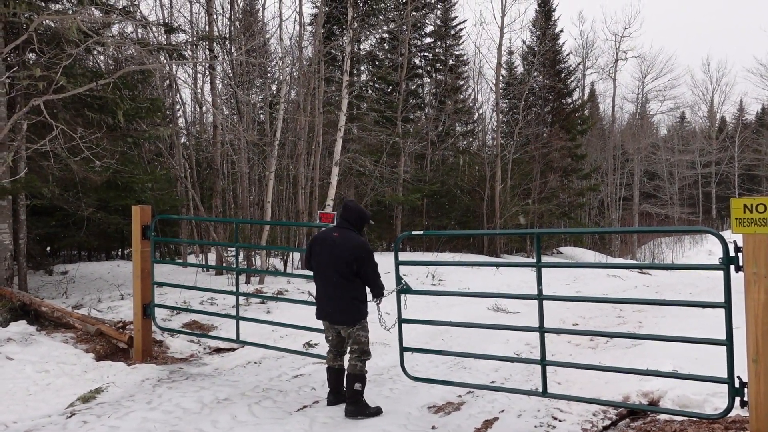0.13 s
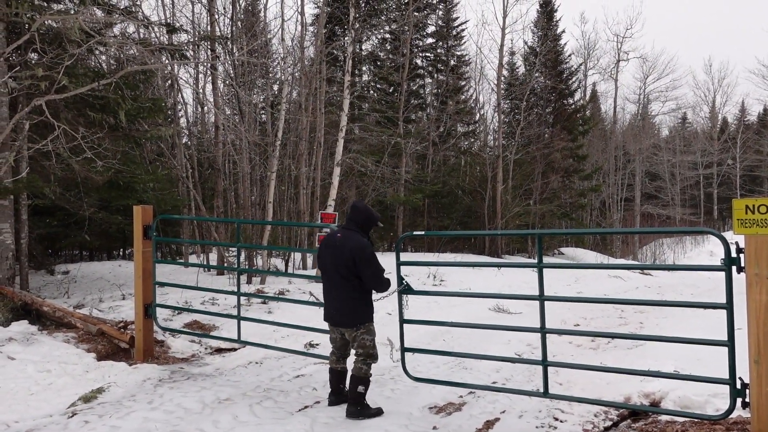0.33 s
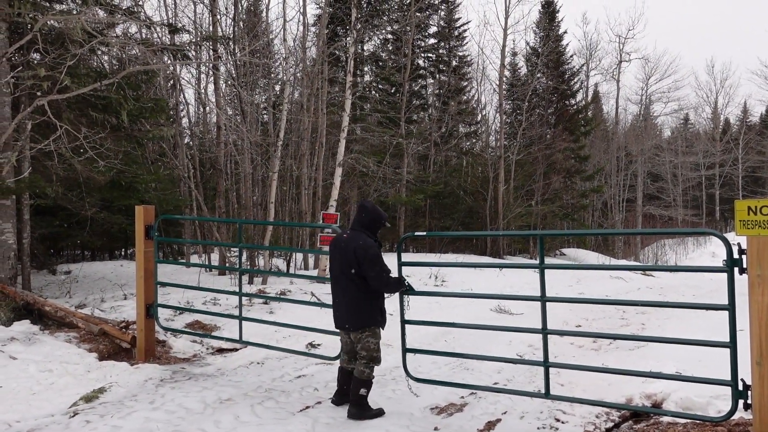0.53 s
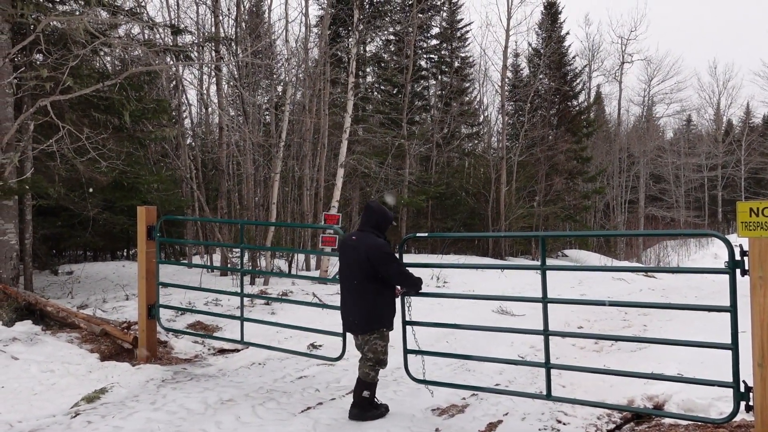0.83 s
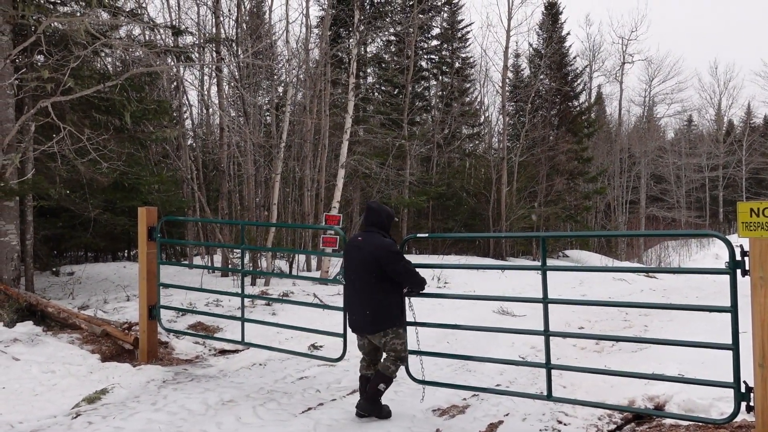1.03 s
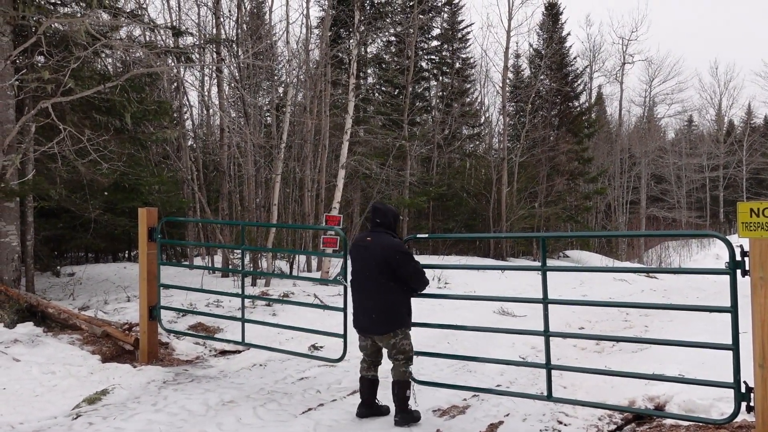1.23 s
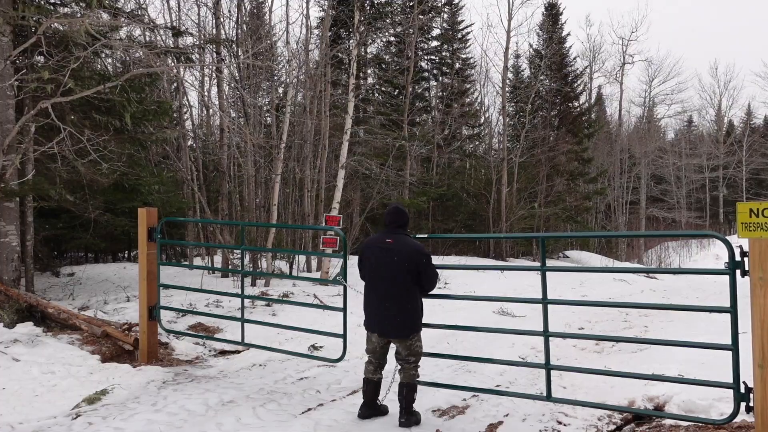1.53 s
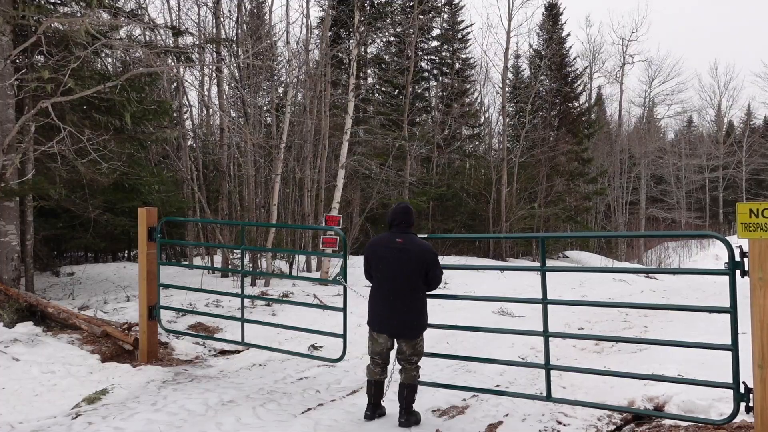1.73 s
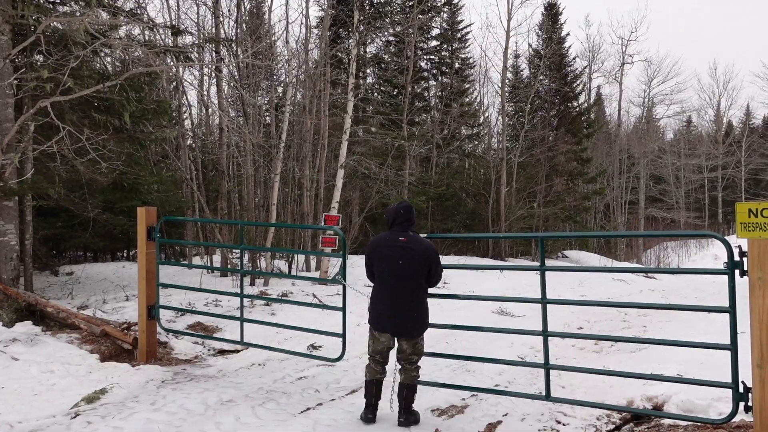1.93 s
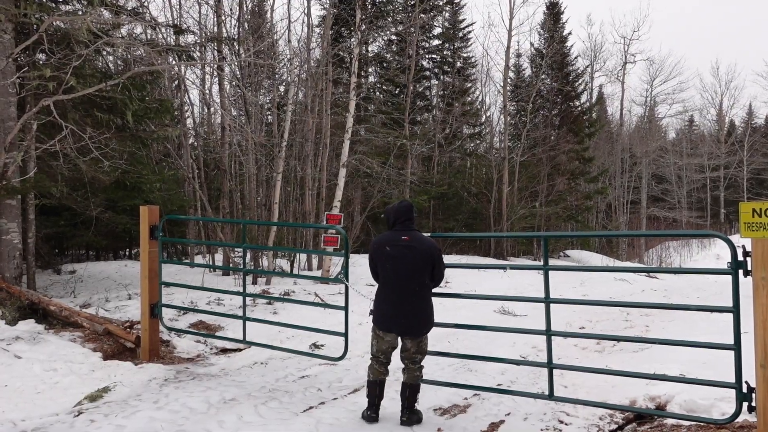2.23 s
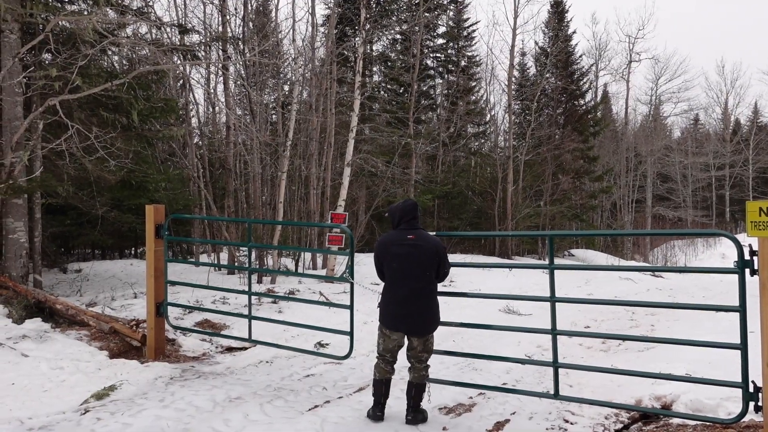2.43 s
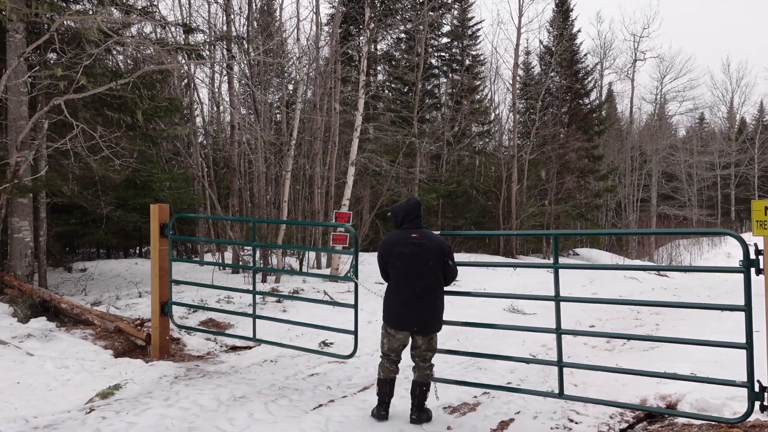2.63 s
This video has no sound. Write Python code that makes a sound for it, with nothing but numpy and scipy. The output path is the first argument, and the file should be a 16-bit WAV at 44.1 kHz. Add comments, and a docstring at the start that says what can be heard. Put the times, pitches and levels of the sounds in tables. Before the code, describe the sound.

Chain clattering on hollow metal gate tubes outdoors, bright ringing clanks with tiny link tinkles

```python
"""On a snowy forest track, a steel chain is unwound from two hollow tube farm gates, some metres away.
Runs of links clatter on the tubes: clusters of impulses excite many decaying modes and noise crashes.
The end hook, the second gate and a long bar ring as sums of decaying sines; loose links tinkle very high.
Boots thud softly in the snow as short noise bursts. The trees return a faint noise-tail echo,
and quiet outdoor air is coloured noise with a faint low drone."""
import sys
import numpy as np
from scipy import signal
from scipy.fft import rfft, irfft
from scipy.io import wavfile

SR = 44100
rng = np.random.default_rng(int(sys.argv[2]) if len(sys.argv) > 2 else 0)


def wav_out(sig):
    """Save sig, one row per channel (or a flat mono array), as 16-bit PCM at SR to the path in sys.argv[1]."""
    wavfile.write(sys.argv[1], SR, np.round(np.clip(np.atleast_2d(sig).T, -1, 1) * 32767).astype(np.int16))


N = 123480
T = np.arange(N) / SR
TOP_HZ = 15950

# Outdoor air spectrum. Each row: frequency in Hz, relative density in dB.
AIR_COLOUR = [(50, -32.5), (110, -6), (200, 2.5), (400, -4), (650, 1.5), (1200, 3), (2500, -1), (5000, -6),
              (9000, -24), (15500, -20)]
AIR_DB, AIR_SWELL_DB = -50.5, 0.5
AIR_SIDE = 0.21  # stereo difference, as a share of the centre
# Faint low drone. Each row: time in seconds, level in dB.
DRONE_LEVEL = [(0, -102), (.5, -72), (.7, -54.5), (1.3, -64), (1.7, -79), (2.8, -82)]
DRONE_HZ = 219

ECHO_DB, ECHO_T60_S, ECHO_RISE_S = -35, 0.7, 0.055

# Boots in the snow. Each row: start in seconds, relative level in dB.
STEPS = [(.806, -50), (1.282, -36.5), (1.631, -51), (1.682, -49)]
# Spectrum of a boot thud. Each row: frequency in Hz, level in dB.
STEP_COLOUR = [(40, -25), (90, -8), (160, 3.5), (250, 2), (380, -13.5), (1200, -52), (5000, -59)]
# Small crunches of the snow crust. Each row: start in seconds, relative level in dB.
CRUNCHES = [(1.874, -40.5)]
# Spectrum of a crunch. Each row: frequency in Hz, level in dB.
CRUNCH_COLOUR = [(300, -30), (1150, 5), (1800, -8), (8000, -29), (14000, -34)]
STEP_T60_S, CRUNCH_T60_S = 0.065, 0.048
SNOW_RISE_S = 0.0024  # attack of thuds and crunches alike

# Knock on a long bar, already ringing out. Each row: start in seconds, level in dB.
LONG_BAR_HITS = [(-.05, -37)]
# Modes of the long bar. Each row: frequency in Hz, level in dB, t60 in seconds.
LONG_BAR_MODES = [(620, -13, 1.2), (835, -12, 1.1), (1179, -2, 1.3), (1592, -4.5, 1.8), (1820, -2, 1.9),
                  (2422, -9, 1.2), (2536, -4, .8), (3946, -1, .55), (5200, -3, .55)]
# Knocks that reach the second gate. Each row: start in seconds, level in dB.
FAR_GATE_HITS = [(2.471, -29)]
# Modes of the second gate. Each row: frequency in Hz, level in dB, t60 in seconds.
FAR_GATE_MODES = [(1240, -11, 1.0), (1825, -11, .85), (2117, -2, .55), (2198, -5, .45), (3737, -7.5, 1.1),
                  (3903, -11, .85), (4002, -7, .4), (5430, -4, .48)]
# Clangs of the end hook. Each row: start in seconds, level in dB.
HOOK_HITS = [(.385, -23), (.414, -20), (.519, -19.5), (1.192, -26)]
# Modes of the end hook. Each row: frequency in Hz, level in dB, t60 in seconds.
HOOK_MODES = [(4015, -7, .3), (5762, -2, .4), (6112, -5, .35), (6141, -1, .35), (6704, -5, .35),
              (6734, -3, .35)]
KNOCK_SCATTER_DB = 1.2  # random spread of mode levels from knock to knock

# Link against link. Each row: start in seconds, ring level in dB, relative tick level in dB.
TINKLES = [(.138, -45.5, 1), (.189, -21.5, -11), (.208, -24.5, -12.5), (.225, -22, -18),
           (0.262, -20.5, -18), (.269, -27.5, -3.5), (.292, -22, -12.5), (.329, -18.5, -31),
           (.48, -16, -15), (.498, -13.5, -24), (.514, -23, 1), (.571, -20.5, 4), (.598, -22, 5),
           (0.849, -42.5, 5.5), (0.885, -40.5, -5), (1.008, -35.5, -9), (1.089, -24, -14),
           (1.107, -24, -11), (1.638, -41.5, 5), (1.649, -32.5, -14), (1.747, -42, -23), (1.85, -38, -16),
           (1.862, -29, -16), (1.885, -30, -28), (1.916, -31.5, -19)]
# Modes of the links. Each row: frequency in Hz, level in dB, t60 in seconds.
LINK_MODES = [(11285, -17, .17), (11735, -9, .2), (12075, -1, .22), (12196, -7, .18), (12360, -12, .13),
              (12505, -3, .2), (13057, -14, .17)]
# Spectrum of the tick. Each row: frequency in Hz, level in dB.
TICK_COLOUR = [(800, -28), (3000, -2), (7000, -1), (10000, -4), (12200, 1), (14500, -16)]
LINK_DETUNE, LINK_SCATTER_DB = 0.00099, 5  # random spread of pitch (as a ratio) and of level
PING_RISE_S, TICK_T60_S = 0.005, 0.0062

# Chain blows on the gate. Each row: start in seconds, level in dB, brightness in dB per octave,
# time constant of the clatter in seconds, relative ring of the main modes in dB.
BLOWS = [(-.06, -27, 4.5, 0.014, -9), (0.377, -18, 4, 0.0089, -3), (.385, -20.5, -3, 0.041, -6),
         (0.413, -16, 13, 0.079, -16), (.44, -19, -4, 0.018, 4), (.49, -31.5, 1, 0.062, 16.5),
         (0.518, -18, -4, 0.015, -0.5), (0.54, -16.5, 11, 0.061, -0.5), (0.584, -18.5, 2, 0.035, 4),
         (.607, -19.5, -6, 0.023, -0.5), (0.625, -24.5, -1, 0.021, 4), (.709, -22.5, 0.5, 0.0096, -9),
         (.872, -33, -8.5, 0.0038, -5.5), (1.01, -42.5, -6.5, 0.012, 4), (1.114, -30.5, -2.5, 0.014, 2),
         (1.164, -28, -2, 0.0095, 4), (1.191, -19, 8, 0.022, -14.5), (1.276, -24.5, -4.5, 0.0094, -3.5),
         (1.29, -28, 9.5, 0.004, -22), (1.34, -23, -0.5, 0.06, -9.5), (1.374, -21, -1.5, 0.021, -17),
         (1.402, -22, 10, 0.019, -5), (1.438, -19, -4.5, 0.0057, -8.5), (1.583, -29.5, -5, 0.013, -13.5),
         (1.644, -36, -4.5, 0.0052, -17), (1.699, -45.5, -11.5, 0.0078, -15), (2.084, -30, -4.5, 0.021, -3),
         (2.11, -23.5, -2, 0.015, -12.5), (2.139, -28.5, 4, 0.029, 6.5), (2.16, -23.5, 1, 0.015, -4.5),
         (2.215, -21.5, -0.5, 0.0048, 3.5), (2.318, -31, -6, 0.0067, -12.5),
         (2.456, -32.5, -5.5, 0.0057, -28.5), (2.47, -18, 2, 0.015, -9.5), (2.494, -24.5, -5, .012, -35)]
# Main modes of the gate tubes. Each row: frequency in Hz, t60 in seconds,
# then relative level in dB when struck at the first, second and third place.
TUBE_MODES = [(1180, .9, -16, -14, -22), (1279, .8, -11, -12, -14), (1600, 1.0, -6.5, -1.5, -5),
              (1657, .75, -8, -13, -2), (1824, .85, -5, -1, -5), (2430, .62, -1.5, -3, -6),
              (2659, .42, -6, -5, -9), (3152, .45, -1.5, -7, -8), (3378, .4, -10, -9, 0),
              (3450, .35, -14, -7, 0), (3781, .5, -.5, -3, -8), (3804, .95, -6, -12, -8),
              (4046, .5, -6, -5, -9), (4295, .55, -7, -8, -6), (4461, .46, 1, -4, 0),
              (4732, .44, -9, -4, -2), (4770, .6, -14, 2, -9), (5071, .47, -3, -5, -6),
              (5430, .45, -14, -8, -6), (5718, .48, -1.5, -12, -14), (8263, .3, -9.5, -20, -28)]
# Times in seconds from which the chain strikes the second and the third place.
PLACE_FROM_S = [1.1, 2.0]
# Colour of the gate's weaker modes, crashes and clinks. Each row: frequency in Hz, level in dB.
TUBE_COLOUR = [(200, -44), (500, -24), (850, -23), (1200, -4), (1430, -12.5), (1650, 2), (2300, 4),
               (2950, 2), (4200, 4), (6000, -4), (7600, -8.5), (10000, -24.5), (15500, -34.5)]
# Ring time of the weaker tube modes. Each row: frequency in Hz, t60 in seconds.
TUBE_T60 = [(600, 0.94), (1200, 0.44), (2400, 0.36), (4500, 0.5), (7000, 0.28), (11000, 0.4), (16000, 0.12)]
MODE_SPACING_HZ, CROWD_SPREAD_DB = 42, 3.5
TUBE_DB, CRASH_DB, RING_DB = -5.5, -6.5, -10.5
CRASH_T60_S = 0.13
CLATTER_PER_S, CLATTER_SIZE = 220, 0.55  # following hits: mean rate, size against the first
SPOT_DB, SPOT_HZ = 3, 363.3  # random colour of each blow: spread, spacing of its points
PIVOT_HZ = 3200  # brightness tilts about this frequency

# Clear clinks of single links on the tubes. Each row: start in seconds, level in dB, frequency in Hz.
CLINKS = [(.577, -34, 4120), (1.193, -22, 2166), (1.291, -25.5, 3960), (2.16, -23, 4650)]
# Partials of a clink. Each row: ratio to its frequency, level in dB.
CLINK_PARTIALS = [(1, 0), (1.05, -5), (1.31, -8), (1.58, -10)]
# lesser clinks within a clatter: count per second of its time constant, relative level, pitch range
CLINKS_PER_S, CLINK_DB, CLINK_LOW_HZ, CLINK_HIGH_HZ = 250, -3.5, 1497, 7000
CLINK_T60_S = 0.095

# Tonal lean of the near sounds. Each row: frequency in Hz, left minus right in dB.
BALANCE_DB = [(500, 1), (2000, -1.3), (3200, -1), (4400, -2.5), (6000, -3.5), (8000, 0.4), (13000, 0.76)]


def amp(db):
    """Turn dB into an amplitude factor."""
    return 10 ** (np.asarray(db) / 20)


def unit(x):
    """Scale to rms 1."""
    return x / np.sqrt(np.mean(x ** 2))


def on_log(hz, points):
    """Read (Hz, value) points on a log-frequency axis."""
    f, v = np.array(points, float).T
    return np.interp(np.log(hz + 1), np.log(f), v)


def bins(size):
    """Frequencies of a spectrum of this many samples."""
    return np.arange(size // 2 + 1) * SR / size


def noise(colour, size):
    """Noise of rms 1 with a (Hz, dB) colour."""
    spectrum = rfft(rng.standard_normal(size))
    return unit(irfft(spectrum * amp(on_log(bins(size), colour)), size))


def fade(t60, size):
    """Exponential decay by 60 dB in t60 seconds."""
    return np.exp(-np.log(1000) * T[:size] / t60)


def rise(seconds, size):
    """Linear fade-in."""
    return np.minimum(T[:size] / seconds, 1)


def add(out, start_s, x):
    """Mix a sound in at a time, which may lie before the start."""
    i = int(round(start_s * SR))
    x, i = x[max(-i, 0):], max(i, 0)
    out[i:i + len(x)] += x[:max(N - i, 0)]


def burst(colour, envelope):
    """A short noise burst with its envelope's rms, coloured by a causal filter."""
    size = len(envelope)
    cepstrum = irfft(np.log(amp(on_log(bins(size), colour))), size)
    # folding the cepstrum forward in time makes the filter minimum phase
    fold = np.r_[1, np.full(size // 2 - 1, 2), np.zeros(size - size // 2)]
    causal = np.exp(rfft(cepstrum * fold))
    x = irfft(rfft(rng.standard_normal(size) * envelope) * causal, size)
    return unit(x) * np.sqrt(np.mean(envelope ** 2))


def ring(modes, scatter_db, detune=0, size=SR):
    """Decaying modes; each contact point weights them differently."""
    out = np.zeros(size)
    for hz, db, t60 in modes:
        louder, sharper, phase = rng.standard_normal(3)
        wave = np.sin(2 * np.pi * (hz * (1 + detune * sharper) * T[:size] + phase))
        out += amp(db + scatter_db * louder) * fade(t60, size) * wave
    return out


def air():
    """Quiet, slowly swelling outdoor noise with a faint low drone of narrow-band noise."""
    swell_points = rng.standard_normal(12)
    swell = amp(AIR_SWELL_DB * np.interp(T, np.linspace(0, T[-1], 12), swell_points))
    side = AIR_SIDE * noise(AIR_COLOUR, N) * np.array([[1], [-1]])
    wide = noise(AIR_COLOUR, N) + side
    drone = noise([(DRONE_HZ / 2, -70), (DRONE_HZ * 0.95, -18), (DRONE_HZ, 0),
                   (DRONE_HZ * 1.42, -18), (DRONE_HZ * 2, -70)], N)
    drone_level = amp(np.interp(T, *np.array(DRONE_LEVEL).T))
    return amp(AIR_DB) * swell * wide + drone * drone_level


def trees(x, size=SR):
    """A thin echo from the forest: a decaying noise tail, drawn afresh for each ear."""
    tail = noise([(300, 14.0), (2000, -7.0), (6000, -2.5), (14000, -5.5)], size)
    tail *= fade(ECHO_T60_S, size) * rise(ECHO_RISE_S, size)
    return amp(ECHO_DB) * signal.fftconvolve(x, tail / np.sqrt(np.sum(tail ** 2)))[:N]


def boots(size=SR // 2):
    """Dull, short thuds in packed snow, and small crunches of its crust, as noise bursts."""
    out = np.zeros(N)
    thuds = (STEPS, STEP_COLOUR, STEP_T60_S)
    crunches = (CRUNCHES, CRUNCH_COLOUR, CRUNCH_T60_S)
    for events, colour, t60 in (thuds, crunches):
        envelope = rise(SNOW_RISE_S, size) * fade(t60, size)
        for start, db in events:
            add(out, start, 2 * amp(db) * burst(colour, envelope))
    return out


def struck(hits, modes):
    """A metal part whose modes ring out after each of its knocks."""
    out = np.zeros(N)
    for start, db in hits:
        add(out, start, amp(db) * ring(modes, KNOCK_SCATTER_DB))
    return out


def long_bar():
    """A long bar, already ringing out from a knock."""
    return struck(LONG_BAR_HITS, LONG_BAR_MODES)


def far_gate():
    """The second gate rings when a knock reaches it."""
    return struck(FAR_GATE_HITS, FAR_GATE_MODES)


def hook():
    """The end hook clangs on a few high, close-set modes."""
    return struck(HOOK_HITS, HOOK_MODES)


def links(size=SR // 2):
    """Loose links meet with a tick and a very high ping; no two are quite alike."""
    out = np.zeros(N)
    for start, db, tick_db in TINKLES:
        tick = amp(tick_db) * burst(TICK_COLOUR, fade(TICK_T60_S, size))
        ping = ring(LINK_MODES, LINK_SCATTER_DB, LINK_DETUNE, size) * rise(PING_RISE_S, size)
        add(out, start, amp(db) * (ping + 2 * tick))
    return out


def clink(hz, size=SR // 4):
    """One link rings briefly before its neighbours damp it."""
    partials = [(hz * ratio, db, CLINK_T60_S) for ratio, db in CLINK_PARTIALS]
    return ring(partials, KNOCK_SCATTER_DB, size=size)


def clatter(length_s, size=SR):
    """One link lands and more follow, ever weaker; total energy 1."""
    lands = rng.random(size) < CLATTER_PER_S / SR
    hits = lands * rng.standard_normal(size) * CLATTER_SIZE * np.exp(-T[:size] / length_s)
    hits[0] = 1
    return hits / np.sqrt(np.sum(hits ** 2))


def tube_response(size=SR):
    """The crowd of weaker tube modes, unevenly spaced, each frequency region with its own ring time."""
    hz = bins(size)
    slots = np.arange(TUBE_COLOUR[0][0], TOP_HZ, MODE_SPACING_HZ)
    place, phase = rng.random((2, len(slots)))
    strength = amp(CROWD_SPREAD_DB * rng.standard_normal(len(slots)))
    crowd = np.zeros(len(hz), complex)
    mode_bins = np.searchsorted(hz, slots + MODE_SPACING_HZ * place)
    crowd[mode_bins] = strength * np.exp(2j * np.pi * phase)
    crowd *= amp(on_log(hz, TUBE_COLOUR))
    out = np.zeros(size)
    for k, (_, t60) in enumerate(TUBE_T60):
        # overlapping bands crossfade from one ring time to the next
        share = on_log(hz, [(f, j == k) for j, (f, _) in enumerate(TUBE_T60)])
        out += irfft(crowd * share, size) * fade(t60, size)
    return out / np.std(irfft(crowd, size))


def sustain(push, hz, t60):
    """A mode stores the energy of each push and loses it slowly; a strong push also upsets its phase."""
    keep = np.exp(-2 * np.log(1000) / (t60 * SR))  # energy kept from sample to sample
    energy = signal.lfilter([1], [1, -keep], push) + 1e-18
    upset = np.cumsum(np.sqrt(push / energy) * rng.choice([-1, 1], N))
    return np.sqrt(energy) * np.sin(2 * np.pi * (hz * T + rng.random()) + upset)


def gate(size=SR):
    """Runs of links crash, clink and set the tubes ringing; the place struck decides which modes speak."""
    out, tubes, hz = np.zeros(N), tube_response(), bins(2 * size)
    modes = np.array(TUBE_MODES, float)
    pushes = np.zeros((len(modes), N))  # energy fed to each main mode
    for start, db, bright_db, length, ring_db in BLOWS:
        def force(f):
            """Strength of this blow at a frequency."""
            return amp(db + bright_db * np.log2(np.clip(f, 1000, 14000) / PIVOT_HZ))

        hits = clatter(length)
        crash = burst(TUBE_COLOUR, fade(CRASH_T60_S, size))
        body = amp(TUBE_DB) * tubes + amp(CRASH_DB) * crash
        spot_db = SPOT_DB * np.interp(hz / SPOT_HZ, np.arange(128), rng.standard_normal(128))
        spectrum = rfft(hits, 2 * size) * rfft(body, 2 * size)
        add(out, start, irfft(spectrum * amp(spot_db) * force(hz))[:size])

        place_db = modes[:, 2 + np.searchsorted(PLACE_FROM_S, start)]
        gains = force(modes[:, 0]) * amp(RING_DB + ring_db + place_db)
        for push, gain in zip(pushes, gains):
            add(push, start, (gain * hits) ** 2)

        count = min(int(CLINKS_PER_S * length) + 1, 20)
        for when, pitch in rng.random((count, 2)):
            f = CLINK_LOW_HZ * (CLINK_HIGH_HZ / CLINK_LOW_HZ) ** pitch
            level = force(f) * amp(CLINK_DB + on_log(f, TUBE_COLOUR)) / np.sqrt(count)
            add(out, start + when * length, level * clink(f))
    for start, db, f in CLINKS:
        add(out, start, amp(db) * clink(f))
    for push, (f, t60) in zip(pushes, modes[:, :2]):
        out += sustain(push, f, t60)
    return out


def thin(x):
    """Slender metal parts radiate no bass: a high-pass."""
    return signal.sosfilt(signal.butter(3, 520, "high", fs=SR, output="sos"), x)


def scene():
    """Gates, chain and boots slightly right of centre, in the forest air."""
    metal = gate() + links() + hook() + far_gate() + long_bar()
    near = thin(metal) + boots()
    lean_db = on_log(bins(N), BALANCE_DB) / 2
    direct = irfft(rfft(near) * amp(np.array([lean_db, -lean_db])), N)
    echo = np.array([trees(near), trees(near)])
    return direct + echo + air()


def record(dry):
    """A steep elliptic low-pass cuts the top."""
    return signal.sosfilt(signal.ellip(10, .2, 80, TOP_HZ, fs=SR, output="sos"), dry)


dry = scene()
out = record(dry)
wav_out(out)
```